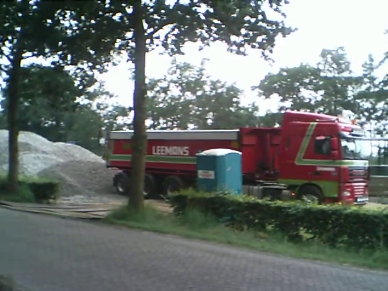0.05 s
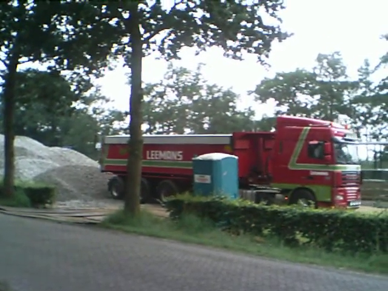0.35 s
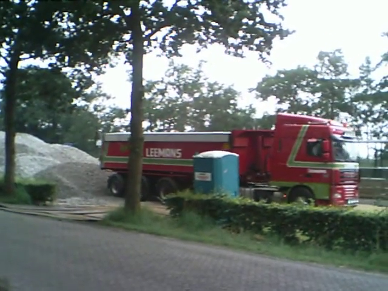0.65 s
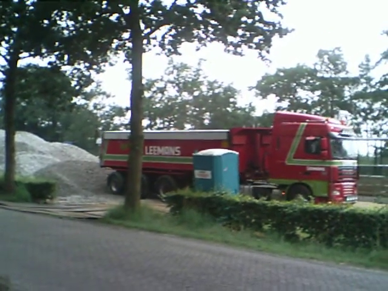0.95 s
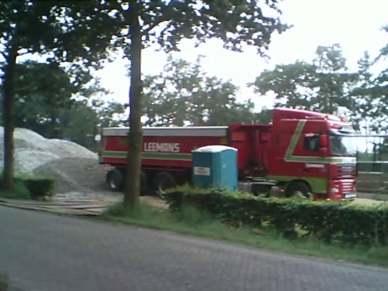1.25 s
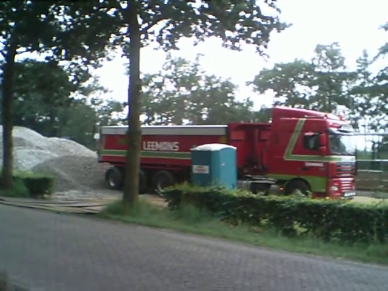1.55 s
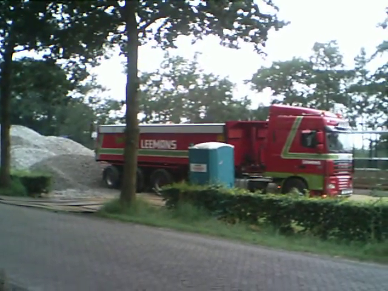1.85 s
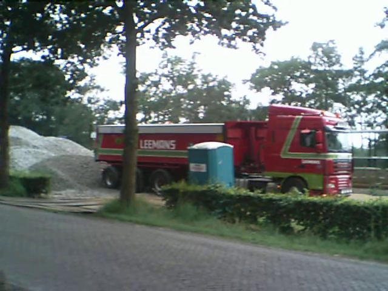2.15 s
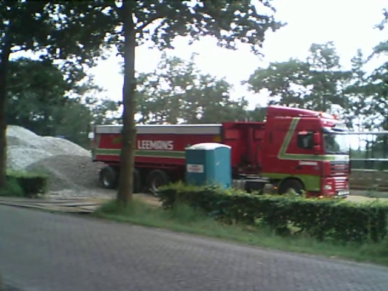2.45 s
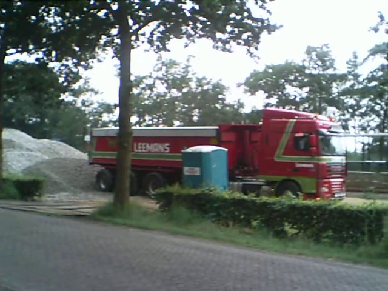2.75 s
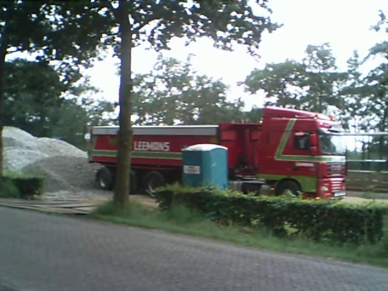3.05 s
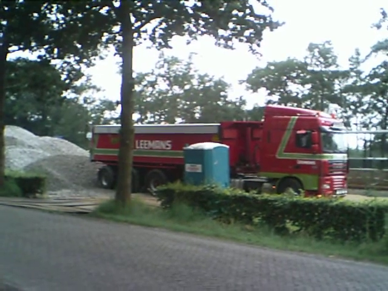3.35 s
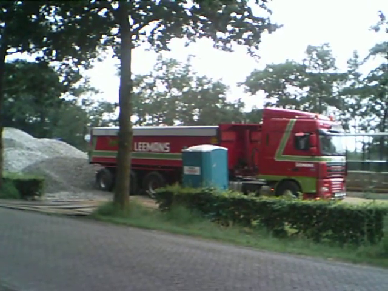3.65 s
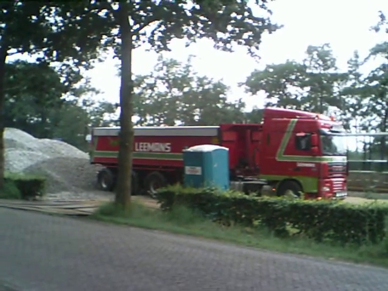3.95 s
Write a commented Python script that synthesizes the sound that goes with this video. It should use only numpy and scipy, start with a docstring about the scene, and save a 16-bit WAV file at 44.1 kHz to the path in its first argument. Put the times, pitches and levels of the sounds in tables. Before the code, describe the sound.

A diesel truck idles outdoors with a steady low rumble. Its load shifts and knocks in the steel body, then the tailgate slams once with a loud, echoing clunk. The microphone adds hiss and a thin high whine.

```python
"""Across a road, a tipper truck idles: engine tones over a roar that pulses with each firing.
Loose load shifts, knocks and clinks in the steel body. The tailgate then slams once, and its
modes ring in a hollow clunk that overloads the microphone and echoes off the yard and trees.
The camera's electronics add a steady hiss and a thin pulsing whine."""
import sys
import numpy as np
from scipy.fft import rfft, irfft
from scipy.io import wavfile
from scipy.ndimage import uniform_filter1d, map_coordinates

SR = 44100
rng = np.random.default_rng(int(sys.argv[2]) if len(sys.argv) > 2 else 0)


def generate_wav(sig):
    """Save sig (samples, or channels by samples) to the path in sys.argv[1] as 16-bit PCM at SR."""
    pcm = np.round(np.clip(np.atleast_2d(sig).T, -1, 1) * 32767).astype(np.int16)
    wavfile.write(sys.argv[1], SR, pcm)


N = 176400

# Tones of the idling engine. Each row: frequency in Hz, rms level in dB.
ENGINE_TONES = [(25.9, -22.5), (34.9, -14.5), (54.6, -25.5), (69.8, -21.5), (90, -37), (146, -38),
                (174, -41), (183, -37.5), (243, -38.5), (350, -40), (560, -39), (700, -48.5), (797, -44.5),
                (1400, -51)]
# Partials of the whine. Each row: frequency in Hz, rms level in dB during a burst.
WHINE_TONES = [(6993, -35.4), (10480, -65)]
# Envelopes of the sustained noises. Each row: time in seconds, gain in dB.
ROAR_ENVELOPE = [(0, 0.5), (1.0, 3), (1.5, 1.5), (2.6, 1.35), (4, 1.1)]
HISS_ENVELOPE = [(0, -43), (.7, -40.5), (1.45, -43), (1.7, -43), (1.9, -42.5), (2.15, -44), (2.7, -44),
                 (4, -45)]
SHIFT_ENVELOPE = [(0, -20.5), (.1, -26.5), (.18, -23), (.26, -20.5), (.29, -25), (.35, -20), (.41, -22),
                  (.45, -18), (.48, -22), (.58, -31), (.65, -19.5), (.72, -27.5), (.8, -21), (.89, -15),
                  (.95, -21.5), (1.02, -28), (1.15, -42), (1.23, -17), (1.36, -27.5), (1.5, -34),
                  (2.74, -54), (2.8, -26), (2.89, -37), (3, -68)]
# Spectra of each source's noise. Each row: frequency in Hz, relative density in dB.
ROAR_SPECTRUM = [(12, -11), (23, -16), (48, -6), (62, -5), (80, -9.5), (110, -7.5), (135, -14),
                 (180, -11.5), (280, -18.5), (353, -20), (500, -26), (620, -19.5), (740, -22), (830, -19.5),
                 (940, -26), (1050, -27), (1170, -26), (1280, -28), (1400, -25.5), (1510, -28), (1620, -24),
                 (1750, -27), (1850, -31), (1970, -32), (2120, -37), (2600, -54), (3400, -69)]
HISS_SPECTRUM = [(1800, -4.5), (2600, 8.5), (3200, 7), (4100, 0), (4900, 3.5), (5500, 4.5), (6200, 1),
                 (7500, -3.5), (10300, -6.5), (11400, -17), (12500, -20), (16000, -48)]
SHIFT_SPECTRUM = [(80, -24), (180, -2.5), (320, -1.5), (560, -10), (820, -7.5), (1050, -22), (1700, -15),
                  (2400, -39), (6000, -73)]
KNOCK_SPECTRUM = [(100, 2), (300, 9.5), (780, 6), (1100, -26), (1600, -19), (2400, -41), (6000, -48),
                  (12000, -65)]
THUD_SPECTRUM = [(60, -23), (130, -0.5), (210, 5.5), (340, -2), (480, -6), (800, -6), (1200, -36),
                 (3000, -55), (9000, -75)]
TRICKLE_SPECTRUM = [(1500, -25), (3000, -14), (5500, 12), (9500, 0), (11500, -20), (14000, -40)]
TICK_SPECTRUM = [(600, -14), (1500, 9), (3000, -5.5), (5400, -7), (8000, -29), (14000, -51)]
PANEL_SPECTRUM = [(60, -18), (180, -1), (350, 9), (800, 3), (1200, 2), (1900, -29), (2800, -36),
                  (5000, -58), (12000, -65)]
CRACK_SPECTRUM = [(500, 4.5), (1700, 12), (3000, -14), (4500, -38), (7000, -16), (12000, -29), (16000, 0)]
ECHO_SPECTRUM = [(70, 0.5), (170, 2), (380, 4), (560, -4), (850, -4), (1100, -15), (1600, -17), (2400, -33),
                 (6000, -76)]
# Spectrum of a clink. Each row: multiple of its pitch, relative density in dB.
CLINK_SPECTRUM = [(.3, -5.5), (.8, -10.5), (1, -4), (1.2, -13), (2, -42), (4, -56), (8, -64)]
# Impacts in the body. Each row: start in seconds, level in dB, pitch in Hz, t60 in seconds.
BODY_KNOCKS = [(.015, -1.5, 440, 0.013), (.079, -9.5, 367, 0.028), (.121, -6, 398, 0.023),
               (.16, -11, 720, .02), (.176, -5.5, 604, 0.022), (.253, -13, 570, 0.024),
               (.315, -8, 493, 0.044), (.3395, 1.5, 504, 0.029), (.358, -4, 493, 0.017),
               (.3845, -7, 710, .018), (.3865, -1, 363, 0.023), (.432, -1, 439, 0.027),
               (.4465, -6, 285, 0.032), (.5115, 1.5, 587, 0.014), (.567, -8, 413, .025),
               (.602, -0.5, 396, 0.023), (.6255, -2.5, 457, 0.048), (.64, -3.5, 499, 0.046),
               (.745, -8.5, 440, 0.019), (.855, -16, 412, 0.017), (.88, -8, 540, 0.02),
               (.8955, -2.5, 337, 0.046), (.9085, -2.5, 1426, 0.024), (2.509, -18.5, 802, 0.083)]
BODY_THUDS = [(.248, -4, 60, 0.18), (1.215, -14, 235, 0.16), (1.561, -1.5, 186, .16),
              (1.912, -15, 231, 0.17), (2.246, -18, 160, 0.15), (2.786, -7, 183, 0.12),
              (2.84, -13.5, 235, 0.11), (3.721, -14, 162, 0.2)]
METAL_CLINKS = [(0.626, -9, 1370, 0.041), (0.629, -31, 2960, 0.2), (0.692, -34, 2980, 0.037),
                (0.908, -17.5, 1420, 0.2), (0.912, -30, 2920, 0.24), (1.531, 5.5, 1740, 0.035),
                (1.88, -17, 1660, 0.32), (2.508, -34, 3050, 0.18)]
# Slides of fine grit. Each row: start in seconds, level in dB, length in seconds.
GRIT_TRICKLES = [(0.422, -39.5, .07), (1.759, -43, 0.17)]
# Stones striking steel. Each row: start in seconds, level in dB.
STONE_TICKS = [(0.628, -30), (0.689, -13), (0.9098, -8), (1.568, -6), (1.597, -20), (2.2438, -27),
               (2.51, -22.5)]
# Steel rubbing on steel. Each row: start in seconds, level in dB, initial pitch in Hz.
STEEL_SQUEAKS = [(0.774, -36, 3020), (.79, -34.5, 2930)]
# Contacts within the one slam. Each row: start in seconds, level in dB.
GATE_CONTACTS = [(1.511, -12), (1.5204, -1), (1.532, 6)]
# Normal modes of the tailgate. Each row: frequency in Hz, relative level in dB, t60 in seconds.
GATE_MODES = [(183.4, -14.5, 0.36), (236.8, -7, 0.23), (333, -7, 0.25), (374.5, -15.5, 0.8),
              (513, -4.5, 0.14), (550.6, -9.5, 0.32), (636, -14.5, 0.54), (779, -11.5, 0.28),
              (937, -29, 0.19), (1153, -16.5, 0.14), (1386, -21.5, 0.26), (1757, -18.5, 0.14),
              (2360, -27, 0.096), (2500, -26, 0.09), (2960, -36, 0.16)]
# Strikes of the latch. Each row: start in seconds, level in dB, length in seconds.
LATCH_CRACKS = [(1.5338, 12, .0045), (1.5438, 13, .0014)]
# Reflections of the slam. Each row: delay in seconds, level in dB, t60 in seconds.
YARD_ECHOES = [(.034, -1.5, 0.6), (.09, -9.5, 0.52), (.14, -12, 0.33), (.25, -17.5, .9)]
# Treble response of the camera. Each row: frequency in Hz, gain in dB.
TREBLE_DROOP = [(9000, 0), (11000, -2), (12500, -14), (16000, -15)]


def amp(db):
    """Amplitude ratio for a level in decibels."""
    return 10 ** (np.asarray(db) / 20)


def unit_rms(x):
    """Normalisation to an rms of 1."""
    return x / np.sqrt(np.mean(x ** 2) + 1e-20)


def clock(size=N):
    """Time in seconds at each sample."""
    return np.arange(size) / SR


def envelope(rows):
    """Gain per sample, interpolated in decibels."""
    return amp(np.interp(clock(), *np.transpose(rows)))


def wobble(knots_per_s):
    """Smooth random modulation through Gaussian knots."""
    return map_coordinates(rng.standard_normal(256), [clock() * knots_per_s], mode="wrap")


def noise(spectrum, size=N, scale=1):
    """Spectrally shaped noise of rms 1; scale multiplies the spectrum's frequencies."""
    hz, db = np.transpose(spectrum)
    bin_hz = np.fft.rfftfreq(size, 1 / SR)
    gain = amp(np.interp(np.log(bin_hz + 1), np.log(hz * scale + 1), db))
    return unit_rms(irfft(rfft(rng.standard_normal(size)) * gain, size))


def decay(t60, attack_s):
    """Exponential damping after a quick rise: 60 dB is lost in t60 seconds."""
    t = clock(SR)
    return np.exp(-np.log(1000) * t / t60) * (1 - np.exp(-t / attack_s))


def ring(hz, t60, rattle_rad=0.92):
    """A damped mode of a loose panel, broadened by the phase modulation of rattling."""
    phase = 2 * np.pi * (hz * clock(SR) + rng.random()) + rattle_rad * wobble(68)[:SR]
    return np.sqrt(2) * np.sin(phase) * decay(t60, attack_s=0.002)


def mix(events):
    """Linear superposition of events, each a start in seconds, a gain in dB and a sound."""
    out = np.zeros(N)
    for start, db, sound in events:
        i = round(start * SR)
        out[i:i + len(sound)] += amp(db) * sound[:N - i]
    return out


def engine(firing_hz=34.77, drift=0.0061, pulse_depth=0.12):
    """A diesel's tones drift with its speed; periodic firing modulates the amplitude of its roar."""
    phase_per_hz = 2 * np.pi * np.cumsum(1 + drift * wobble(4)) / SR
    drone = np.zeros(N)
    for hz, db in ENGINE_TONES:
        peak = np.sqrt(2) * amp(db + 1.76 * wobble(6.8))
        drone += peak * np.sin(hz * phase_per_hz + 2 * np.pi * rng.random())
    pulsing = 1 + pulse_depth * np.cos(firing_hz * phase_per_hz)
    roar = unit_rms(noise(ROAR_SPECTRUM) * pulsing) * amp(-21.5 + 0.29 * wobble(10))
    return drone + roar * envelope(ROAR_ENVELOPE)


def camera(burst_hz=81.355, duty=0.78, jitter_rad=0.39, edge_cycles=0.0037):
    """Electronic hiss, and a whine whose gating into bursts spreads each partial into sidebands."""
    burst, position = np.divmod(clock() * burst_hz + 0.5, 1)
    scatter = jitter_rad * rng.standard_normal(int(burst[-1]) + 1)[burst.astype(int)]
    phase = np.pi * burst + scatter + 1.1 * wobble(1.7)  # bursts alternate in sign
    whine = sum(amp(db) * np.sin(2 * np.pi * hz * position / burst_hz + phase) for hz, db in WHINE_TONES)
    gate = np.clip((duty / 2 - abs(position - 0.5)) / edge_cycles + 0.5, 0, 1)
    return np.sqrt(2) * gate * whine + noise(HISS_SPECTRUM) * envelope(HISS_ENVELOPE)


def shifting_load():
    """The moving load rumbles as low noise, made lumpy by random amplitude modulation."""
    return noise(SHIFT_SPECTRUM) * envelope(SHIFT_ENVELOPE) * amp(1.9 * wobble(45.7))


def body_impacts(rows, spectrum, noise_db):
    """Impulsive excitation of the steel body gives one damped mode and a burst of noise."""
    events = []
    for start, db, hz, t60 in rows:
        burst = amp(noise_db) * noise(spectrum, SR) * decay(t60, attack_s=0.0005)
        events.append((start, db, ring(hz, t60) + burst))
    return mix(events)


def trickles():
    """The tiny collisions of sliding grit merge into a swell of bright noise."""
    events = []
    for start, db, length in GRIT_TRICKLES:
        arch = np.sin(np.pi * np.minimum(clock(SR) / length, 1))
        events.append((start, db, noise(TRICKLE_SPECTRUM, SR) * np.sqrt(abs(arch))))
    return mix(events)


def clinks():
    """Small metal pieces resonate when struck: decaying noise with a peak at their pitch."""
    return mix((start, db, noise(CLINK_SPECTRUM, SR, scale=hz) * decay(t60, attack_s=0.00014))
               for start, db, hz, t60 in METAL_CLINKS)


def ticks():
    """Stone meets steel in a brief contact, which gives a broad spectrum."""
    return mix((start, db, noise(TICK_SPECTRUM, SR) * decay(t60=0.0087, attack_s=0.00068))
               for start, db in STONE_TICKS)


def squeaks(length_s=0.016, pitch_sag=0.062):
    """Friction of steel on steel excites short, rough, slightly falling chirps."""
    progress = np.minimum(clock(SR) / length_s, 1)
    events = []
    for start, db, hz in STEEL_SQUEAKS:
        phase = 2 * np.pi * np.cumsum(hz * (1 - pitch_sag * progress)) / SR
        roughness = 0.86 * wobble(620)[:SR]
        events.append((start, db, 2 * np.sin(np.pi * progress) * np.sin(phase + roughness)))
    return mix(events)


def tailgate():
    """Each contact excites the gate's normal modes; the dense panel modes overlap into noise."""
    events = []
    for start, db in GATE_CONTACTS:
        modes = sum(amp(mode_db + rng.normal(0, 0.51)) * ring(hz, t60) for hz, mode_db, t60 in GATE_MODES)
        panels = amp(-2.5) * noise(PANEL_SPECTRUM, SR) * decay(t60=0.21, attack_s=0.0014)
        events.append((start, db, modes + panels))
    return mix(events)


def latch():
    """Hard steel contacts radiate broadband cracks: flat-topped pulses of noise."""
    events = []
    for start, db, length in LATCH_CRACKS:
        pulse = np.exp(-np.minimum(clock(SR) / length, 10) ** 6)
        events.append((start, db, noise(CRACK_SPECTRUM, SR) * pulse))
    return mix(events)


def echoes():
    """Diffuse reflection from yard and trees follows the strongest contact as dull, decaying noise."""
    slam_s, _ = max(GATE_CONTACTS, key=lambda row: row[1])
    return mix((slam_s + delay, db, noise(ECHO_SPECTRUM, SR) * decay(t60, attack_s=0.0098))
               for delay, db, t60 in YARD_ECHOES)


def gain_control(x, overload_rms=1.0, window_s=0.025, cut_steps=2, step_db=1.5, step_s=0.41):
    """Automatic gain control: an overload cuts the gain, which recovers in timed steps."""
    t, width = clock(), round(window_s * SR)
    overloaded = uniform_filter1d(x ** 2, width) > overload_rms ** 2
    since_overload = t - np.maximum.accumulate(np.where(overloaded, t, -np.inf))
    steps_down = np.ceil(np.maximum(cut_steps - since_overload / step_s, 0))
    return x * amp(-step_db * uniform_filter1d(steps_down, width))


def scene():
    """Truck, echoes and camera noise superpose in one channel."""
    out = engine() + shifting_load()
    out += body_impacts(BODY_KNOCKS, KNOCK_SPECTRUM, noise_db=-6)
    out += body_impacts(BODY_THUDS, THUD_SPECTRUM, noise_db=-9)
    out += clinks() + ticks() + trickles() + squeaks()
    out += tailgate() + latch() + echoes()
    return (out + camera())[None]


def record(dry, ceiling=0.70, dc_offset=-0.0765, band_limit_hz=15800):
    """After gain control the input clips hard and sits off zero; a low-pass response dulls the treble."""
    clipped = np.clip(gain_control(dry[0]), -ceiling, ceiling) + dc_offset
    padded = np.pad(clipped, SR, mode="reflect", reflect_type="odd")
    hz = np.fft.rfftfreq(len(padded), 1 / SR)
    response = amp(np.interp(hz, *np.transpose(TREBLE_DROOP))) / (1 + (hz / band_limit_hz) ** 80)
    return irfft(rfft(padded) * response)[None, SR:SR + N]


dry = scene()
out = record(dry)
generate_wav(out)
```